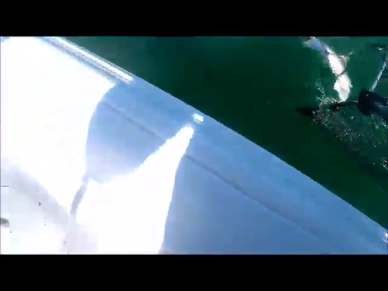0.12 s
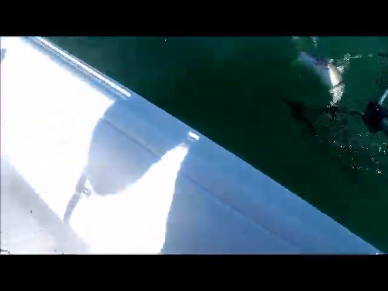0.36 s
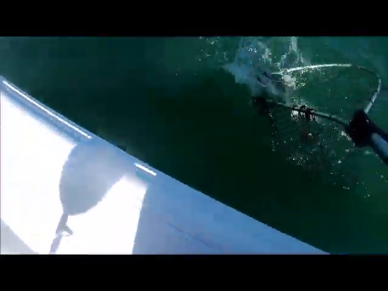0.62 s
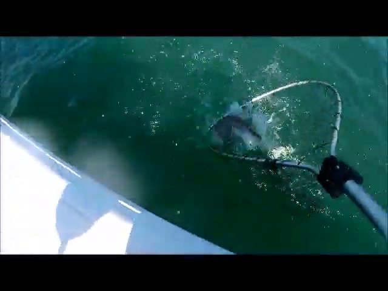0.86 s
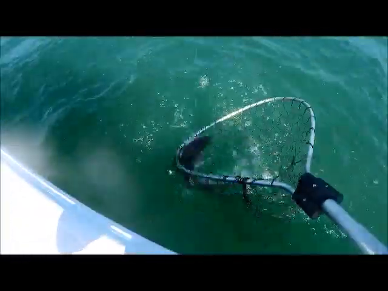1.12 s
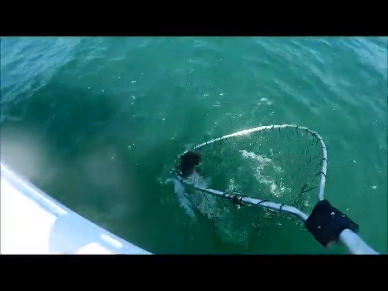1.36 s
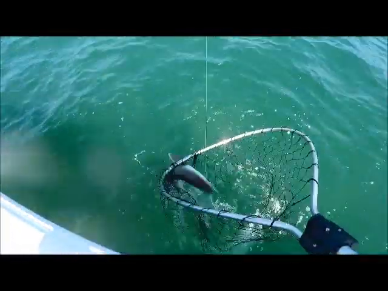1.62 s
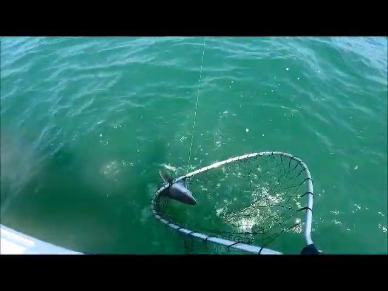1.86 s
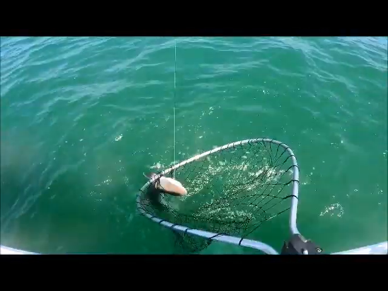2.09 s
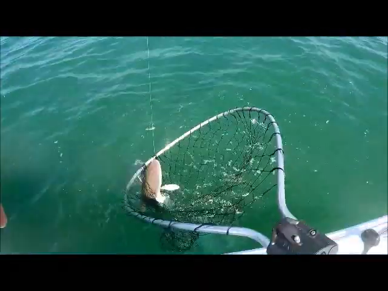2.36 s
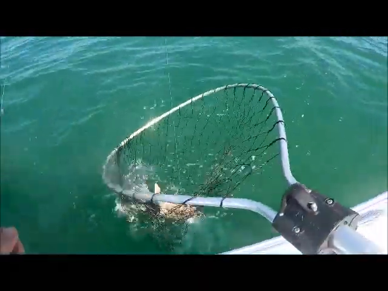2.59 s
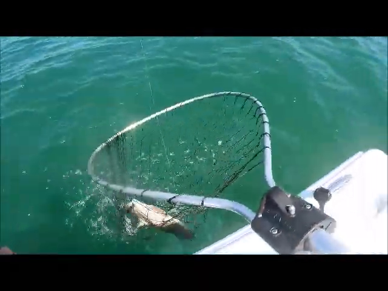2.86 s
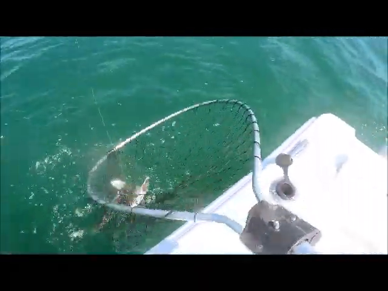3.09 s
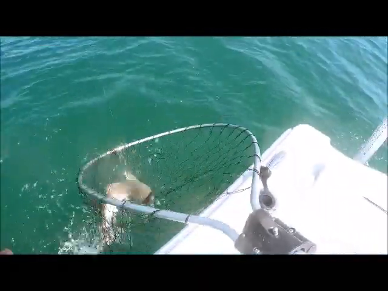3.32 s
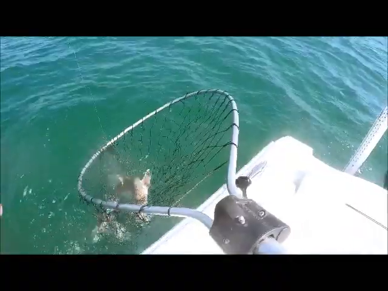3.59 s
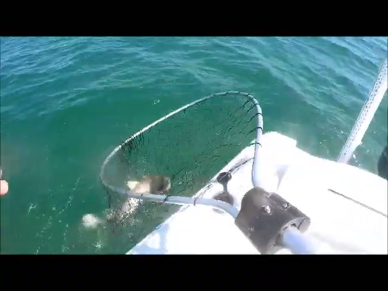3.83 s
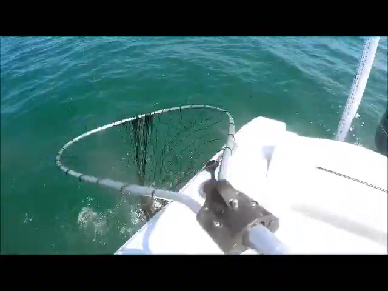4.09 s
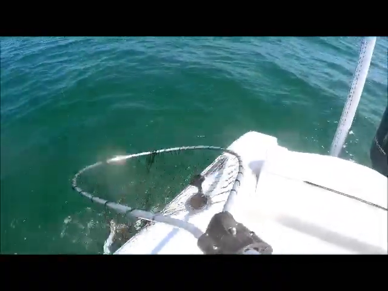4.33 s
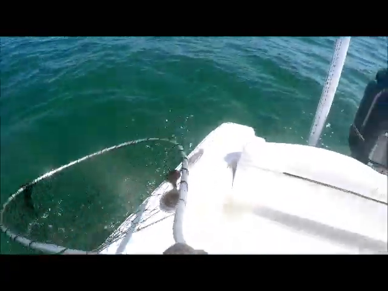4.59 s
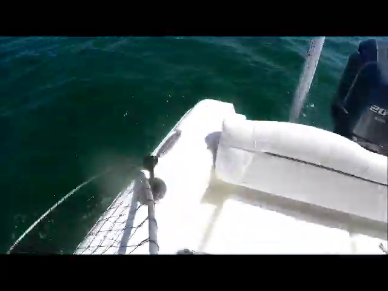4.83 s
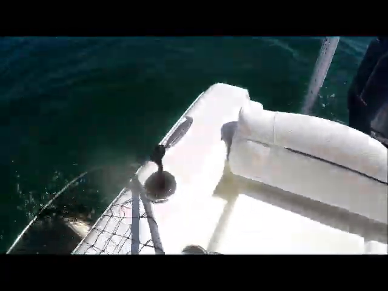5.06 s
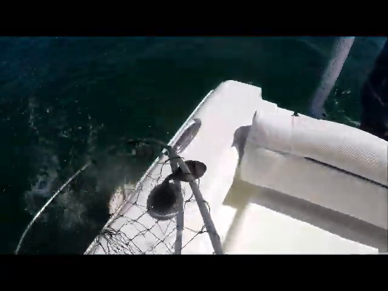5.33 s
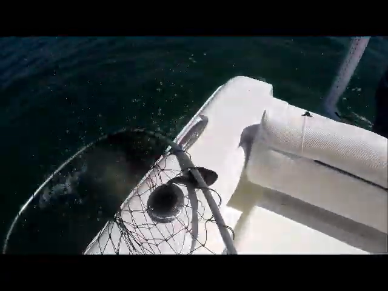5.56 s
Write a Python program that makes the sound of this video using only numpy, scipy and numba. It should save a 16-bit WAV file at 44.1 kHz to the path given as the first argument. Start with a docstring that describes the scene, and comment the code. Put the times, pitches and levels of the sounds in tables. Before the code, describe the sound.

Muffled watery slaps and bubbling churn under low wind rumble turn suddenly brighter, ending in sharp clattering knocks and hollow hull booms.

```python
"""Fish thrashing in a landing net

A fish thrashes in a net beside a boat, heard by a small camera in a plastic housing.
Damped gliding sines and noise bands make bubbles and spray; enveloped noise makes the slaps.
Late on the net frame knocks the hull: noise cracks, decaying modes and low booms. Housing
resonances colour water and knocks. Wind noise buffets the microphone over a faint low hum,
a whistle and patches of high hiss; the treble stays shut for the first three seconds."""
import sys
import numpy as np
from scipy import signal
from scipy.fft import rfft, irfft
from scipy.io import wavfile
from scipy.ndimage import uniform_filter1d
from numba import njit

SR = 44100
rng = np.random.default_rng(int(sys.argv[2]) if len(sys.argv) > 2 else 0)


def wav_out(sig):
    """Save sig, one row per channel (or a flat mono array), as 16-bit PCM at SR to the path in sys.argv[1]."""
    wavfile.write(sys.argv[1], SR, np.round(np.clip(np.atleast_2d(sig).T, -1, 1) * 32767).astype(np.int16))


def voltage_ratio(level):
    """Linear amplitude factor for a level in decibels (scalar or array-like)."""
    return 10 ** (np.asarray(level, float) / 20)


N = 250929
T = np.arange(N) / SR


def curve(table):
    """Linear interpolation: the columns after the time column, one value a sample."""
    s, *columns = np.transpose(table)
    return [np.interp(T, s, column) for column in columns]


def unit(x):
    """Power normalisation: scale to rms 1."""
    return x / np.sqrt(np.mean(x ** 2))


def noise(length=N):
    """White noise: equal power at all frequencies."""
    return rng.standard_normal(length)


def band(x, lo_hz, hi_hz, order=2):
    """Band limiting by a Butterworth band-pass."""
    edges_hz = [lo_hz, min(hi_hz, .45 * SR)]
    return signal.sosfilt(signal.butter(order, edges_hz, "band", fs=SR, output="sos"), x)


def walk(rate_hz):
    """Slow random modulation: levels held 1 / rate_hz seconds and smoothed twice, rms 1."""
    hold = int(SR / rate_hz)
    steps = np.repeat(noise(N // hold + 1), hold)
    return unit(uniform_filter1d(uniform_filter1d(steps, hold), hold)[:N])


def add(out, s, sound):
    """Superposition: mix a sound in at s seconds."""
    i = int(s * SR)
    out[i:i + len(sound)] += sound[:N - i]


def fade(t60_s, rise_s):
    """Exponential decay after a quick rise: time axis and envelope."""
    t = np.arange(int(t60_s * SR) + 64) / SR
    return t, (1 - np.exp(-t / rise_s)) * np.exp(-np.log(1000) * t / t60_s)


def swells(s, db, t60_s, rise_s):
    """Superposed envelopes: the gain of a string of quick rises and slower falls."""
    out = np.zeros(N)
    for start_s, level_db, fall_s in zip(s, db, t60_s):
        add(out, start_s, voltage_ratio(level_db) * fade(fall_s, rise_s)[1])
    return out


@njit
def ring(start, hz, cycles, size, glide, n):
    """Bubble resonance: damped sines glide up as they die, like bubbles rising to the surface."""
    out = np.zeros(n)
    for k in range(len(start)):
        length = int(5 * cycles[k] * SR / hz[k])
        # amplitude falls by a factor e every `cycles` periods of the starting pitch
        phase, decay = 0., hz[k] / (cycles[k] * SR)
        for i in range(min(length, n - start[k])):
            phase += 2 * np.pi * hz[k] * (1 + glide * i / length) / SR
            out[start[k] + i] += size[k] * np.exp(-i * decay) * np.sin(phase)
    return out


def grains(count, lo_hz, hi_hz, cycles, scatter_db, glide):
    """Random superposition: a shower of bubbles at random times, some louder than the rest."""
    when, pitch, loudness, damping = rng.random((count, 4)).T
    hz = lo_hz * (hi_hz / lo_hz) ** pitch
    size = voltage_ratio(-scatter_db * np.log(1 - .96 * loudness))
    start = (when * N).astype(np.int64)
    return unit(ring(start, hz, cycles * (.5 + damping), size, glide, N))


# How hard the fish churns the water, before ragged variation and the housing.
# Each row: time in seconds, bubble level in dB, fineness of the drops in dB.
CHURNING = [(0, -68.5, -13), (.32, -79, -22), (.35, -60.5, -19), (.44, -69.5, -8), (.48, -54, -23),
            (.69, -57, -14.5), (.9, -58.5, -6.5), (1.1, -57, -3), (1.16, -65, 4), (1.35, -59.5, -2),
            (1.52, -61.5, 9.5), (1.57, -64.5, -2), (1.94, -62.5, -4), (2.02, -68, -5), (2.3, -67, -20),
            (2.55, -64.5, -1), (3.05, -71.5, -8), (3.2, -65.5, -7), (3.3, -62, 3.5), (3.6, -64.5, 1.5),
            (3.82, -63.5, -7), (4.16, -65.5, 4.5), (4.41, -61, -1), (4.6, -67.5, -1.5), (4.84, -63.5, -0.5),
            (5.15, -65, 0), (5.4, -62.5, -3), (5.69, -53.5, -5.5)]
# Tail strokes that throw water, before ragged variation and the housing.
# Each row: start in seconds, bubble level in dB, fineness in dB, t60 in seconds.
TAIL_STROKES = [(.48, -55, 5, 0.19), (.578, -43, -13, 0.053), (.68, -63, 9, 0.35), (.96, -53, -15, 0.27),
                (1.065, -58, 9, 0.17), (1.355, -57.5, 15, 0.24), (1.448, -53, -25, 0.28),
                (1.513, -45.5, -1, 0.11), (2.323, -62, 19, 0.066), (2.395, -57, -3, 0.083),
                (2.772, -54.5, 0, 0.13), (3.1, -54, -15, 0.079), (3.452, -57.5, -6.5, 0.55),
                (3.55, -77, 24, 0.15), (3.835, -46, -12, 0.041), (3.904, -59.5, -8, 0.36),
                (4.166, -48.5, 1, 0.061), (4.555, -63, 6, 0.27), (4.774, -59.5, -1, .1),
                (4.9, -45, -28, 0.55), (5.03, -40.5, -25, 0.16), (5.18, -50.5, -19, 0.52),
                (5.25, -50.5, -19, 0.37)]


def water():
    """Bubble resonance and turbulence: bubbles, fizz and spray, each over a hiss of torn surface."""
    fizz_db, spray_db = -0.5, 4  # over the bubbles
    fizz_follows, spray_follows = 0.59, 0.49  # dB gained per dB of fineness
    stroke_rise_s = 0.0067
    sea_db = -69  # distant wash of small waves
    churn_db, fine_db = curve(CHURNING)
    s, stroke_db, stroke_fine_db, t60 = np.transpose(TAIL_STROKES)

    def gain(follows):
        """Gain of churning and tail strokes together, at a given share of the fineness."""
        strokes = swells(s, stroke_db + follows * stroke_fine_db, t60, stroke_rise_s)
        return voltage_ratio(churn_db + follows * fine_db) + strokes

    bubbles = grains(count=800, lo_hz=608.0, hi_hz=2815, cycles=5.8, scatter_db=3.5, glide=0.38)
    fizz = grains(count=1800, lo_hz=2200, hi_hz=5080, cycles=4.2, scatter_db=6.5, glide=0.16)
    spray = grains(count=7000, lo_hz=5350, hi_hz=11800, cycles=5.6, scatter_db=5.5, glide=0.075)
    bubble_hiss = unit(band(noise(), 400, 2050))
    fizz_hiss = unit(band(noise(), 2700, 4260))
    spray_hiss = unit(band(noise(), 5200, 11500))
    churn = gain(0) * (bubbles + voltage_ratio(-0.5) * bubble_hiss)
    churn += voltage_ratio(fizz_db) * gain(fizz_follows) * (fizz + voltage_ratio(-1) * fizz_hiss)
    churn += voltage_ratio(spray_db) * gain(spray_follows) * (spray + voltage_ratio(2.5) * spray_hiss)
    ragged_db = 1.2 * walk(70)
    sea = voltage_ratio(sea_db + 0.52 * walk(1.6)) * unit(band(noise(), 400, 10000, order=1))
    return voltage_ratio(ragged_db) * churn + sea


# Slaps and drops on the water, before the housing.
# Each row: start in seconds, spatter level in dB, starting cavity pitch in Hz,
# cavity level over the spatter in dB.
WATER_SLAPS = [(.338, -34, 1070, -5.5), (.367, -47, 3520, -4), (.381, -43.5, 2420, -3),
               (.418, -51, 1460, 8), (0.449, -55, 4400, 1), (.454, -45.5, 740, 5), (.473, -42, 1065, 11),
               (.528, -44, 950, 6), (.582, -38, 950, -6), (0.636, -36.5, 1510, -1), (.682, -33, 1050, -17),
               (.724, -40.5, 710, 12), (0.776, -52, 755, 22.5), (0.876, -42, 1090, -18),
               (.922, -45, 2750, 8), (.943, -52, 1010, -2), (.967, -35, 1050, -7), (1.003, -46, 1000, 12),
               (1.041, -55, 1010, 14), (1.073, -36, 926, 3.5), (1.128, -47, 1680, 10),
               (1.133, -51.5, 523, 13), (1.201, -52.5, 1550, 12), (1.231, -58, 1200, 14),
               (1.277, -43, 1010, -4), (1.362, -46, 4400, 12.5), (1.425, -41, 3820, 6.5),
               (1.453, -43, 1000, 6.5), (1.519, -35, 917, 3.5), (1.582, -53.5, 1380, 15),
               (1.648, -51, 2240, 3), (1.692, -39, 1100, -13), (1.724, -62, 1410, 20),
               (1.818, -52, 1050, 0), (1.861, -55, 4360, 10.5), (1.955, -57.5, 1080, 13.5),
               (2.304, -48.5, 1120, 2.5), (2.338, -55.5, 1070, 9), (2.395, -39.5, 1000, -12),
               (2.487, -38, 2390, -6), (2.767, -52, 3730, 9), (2.786, -50, 624, 12), (2.792, -42, 870, 0),
               (3.092, -51, 554, 4), (3.116, -59, 549, 13), (3.283, -44, 3880, 2), (3.308, -45, 1160, 2),
               (3.377, -38.5, 2280, -10), (3.555, -44, 2210, 5), (3.566, -51.5, 3160, 17),
               (3.607, -40.5, 980, -26), (3.751, -43, 3630, -6), (3.836, -55.5, 970, 14),
               (3.906, -42, 1040, -4), (4.07, -51.5, 930, 4), (4.176, -42, 1035, -2), (4.31, -40, 950, -11),
               (4.472, -52, 1130, 5), (4.519, -59, 1030, 10), (4.565, -60, 501, -8),
               (4.695, -40.5, 1080, -5.5)]


def slaps():
    """Cavity resonance: each short broad spatter excites a cavity that rings at a rising pitch."""
    out = np.zeros(N)
    for s, db, hz, cavity_db in WATER_SLAPS:
        t, env = fade(0.025, 0.0011)
        spatter = unit(band(noise(8192), 400, 9900, order=1))[:len(t)]
        cavity = np.sin(2 * np.pi * hz * t * (1 + 2.5 * t))
        add(out, s, voltage_ratio(db) * env * (spatter + voltage_ratio(cavity_db) * cavity))
    return out


# Knocks of the net frame, before the housing.
# Each row: start in seconds, crack level in dB, brightness over the crack in dB,
# crack pitch in Hz, t60 of the crack in seconds.
FRAME_KNOCKS = [(4.757, -51, 21.5, 3140, 0.037), (4.835, -59, 22, 4500, .02), (4.855, -45, 7, 3600, 0.052),
                (4.89, -17, 0.5, 3750, 0.054), (4.956, -27.5, -22, 3650, 0.035),
                (4.987, -52, 16, 4500, 0.017), (5.0, -37.5, 7, 3720, 0.015), (5.012, -16.5, 1, 2340, 0.059),
                (5.091, -47.5, -15, 2230, 0.059), (5.173, -39.5, -2, 2200, .13),
                (5.249, -57, 1, 3000, .077), (5.279, -45, -20, 2280, 0.049), (5.343, -46.5, 6, 2300, 0.11),
                (5.376, -42.5, 7.5, 2310, 0.031), (5.4415, -25.5, -2, 5050, 0.03),
                (5.473, -36, 3, 2050, 0.029), (5.514, -57, 11, 2200, .027), (5.5767, -12.5, 6, 4500, 0.009),
                (5.619, -44, 0, 2280, 0.014), (5.668, -43.5, 8, 3600, .059)]
# Modes of the net frame, before the random mix and the scaling of each blow.
# Each row: pitch in Hz, level relative to the crack in dB, nominal t60 in seconds.
FRAME_MODES = [(648, -4, 0.083), (1163, -17, 0.064), (1191, -4.5, 0.1), (1745, -17, 0.19), (2130, 0, 0.045),
               (2340, -5.5, 0.092), (2584, -6, 0.068), (3157, 0, 0.044), (3280, 9.5, 0.022),
               (3750, 5, 0.028)]


def crack(env, bright_db, hz, t60):
    """Impact noise: a pitched crack with a duller body and a treble that dies faster."""
    n = len(env)
    pitched = unit(band(noise(8192), 0.877 * hz, 1.103 * hz))[:n]
    # the shorter the contact, the more the crack's own pitch stands out
    mid = unit(band(noise(8192), 1360, 6900))[:n] + (.5 + .025 / t60) * pitched
    body_db = -5.5 - 3.5 * np.log2(hz / 2300)  # higher cracks have less body
    body = voltage_ratio(body_db) * unit(band(noise(8192), 464, 1490))[:n]
    bright = voltage_ratio(bright_db) * unit(band(noise(8192), 5400, 9100, order=1))[:n]
    return env * (mid + body + bright * env ** .5)


def knocks():
    """Modal excitation: a hard crack, a rattling tail, and frame modes in a new mix at every blow."""
    tail_db, tail_t60_s = -17.5, 0.061
    out = np.zeros(N)
    for s, db, bright_db, hz, t60 in FRAME_KNOCKS:
        env = fade(t60, 0.000093)[1]
        add(out, s, voltage_ratio(db) * crack(env, bright_db, hz, t60))
        # short contacts excite the modes less and for less time
        mode_gain = min(t60 / 0.046, 1)
        for mode_hz, mode_db, mode_t60 in FRAME_MODES:
            detune, share = noise(2)
            t, env = fade(mode_t60 * min(t60 / 0.07, 1.2), 0.0012)
            tone = np.sin(2 * np.pi * mode_hz * (1 + 0.013 * detune) * t)
            add(out, s, mode_gain * voltage_ratio(db + mode_db + 2.55 * share) * env * tone)
        t, env = fade(tail_t60_s, 0.0014)
        rattle = unit(band(noise(8192), 550, 3100))[:len(t)]
        # the shorter the contact, the freer the handle rings on
        handle = unit(band(noise(8192), 1970, 2140))[:len(t)] * (0.024 / t60) ** 1.43
        add(out, s, voltage_ratio(db + tail_db) * env * (rattle + handle))
    return out


# Booms of the hull.
# Each row: start in seconds, level in dB before the envelope, pitch in Hz, t60 in seconds.
HULL_BOOMS = [(0.124, -43.5, 406, 0.095), (0.482, -23, 172, 0.045), (0.609, -39.5, 214, 0.097),
              (0.726, -33.5, 259, 0.094), (1.044, -30.5, 304, 0.032), (1.128, -38, 253, 0.054),
              (1.516, -18.5, 270, 0.026), (2.404, -38.5, 177.6, 0.2), (2.515, -30, 199, 0.14),
              (2.557, -33.5, 205.5, 0.12), (3.09, -38, 164, 0.055), (3.85, -38.5, 318, 0.077),
              (3.987, -33.5, 272, 0.057), (4.307, -22.5, 148, 0.097), (4.698, -37.5, 230, 0.088),
              (4.86, -24, 224, 0.045), (4.894, -26, 251, 0.14), (5.029, -15.5, 238, 0.07),
              (5.113, -30, 213, 0.092), (5.183, -27, 175, 0.028), (5.283, -37, 215, 0.17),
              (5.358, -31.5, 236, 0.11), (5.449, -23, 226, 0.093), (5.578, -15.5, 328, 0.022)]


def thumps():
    """Damped oscillation: the hull booms briefly when water or the frame hits it."""
    out = np.zeros(N)
    for s, db, hz, t60 in HULL_BOOMS:
        t, env = fade(t60, 0.003)
        add(out, s, voltage_ratio(db) * env * np.sin(2 * np.pi * hz * t))
    return out


# Wind strength at the microphone port, before random variation.
# Each row: time in seconds, rumble level in dB.
WIND_STRENGTH = [(0, -37), (.1, -43), (.33, -50), (.46, -35), (.62, -44.5), (.97, -40), (1.05, -45.5),
                 (1.38, -41), (1.8, -41.5), (1.87, -37.5), (2.1, -43), (2.25, -38), (2.8, -34),
                 (3.05, -39.5), (3.1, -31), (3.77, -34.5), (4.14, -31.5), (4.28, -44.5), (4.33, -14),
                 (4.4, -29.5), (4.86, -30.5), (5.07, -37), (5.18, -28), (5.3, -36.5), (5.69, -34.5)]
# Puffs that raise the flutter, before random variation.
# Each row: start in seconds, level in dB, t60 in seconds.
WIND_PUFFS = [(0.431, -35.5, 0.84), (.6, -46, 0.56), (.72, -37, 0.14), (1.5, -40, 0.27),
              (1.78, -46.5, 0.51), (2.06, -45.5, 0.64), (2.32, -41, 0.81), (2.5, -33, 0.28),
              (2.7, -40, 0.42), (2.88, -49, 0.36), (3.28, -50.5, 1), (3.92, -37, 0.45), (4.15, -37, 0.17),
              (4.3, -39, 0.46), (4.72, -47, 0.34), (4.89, -24.5, 0.37), (5.01, -38, 0.88),
              (5.15, -53, 0.57), (5.43, -41, 0.34), (5.56, -39.5, 0.26)]
# Single heavy buffets.
# Each row: start in seconds, level in dB before the envelope, pitch in Hz, t60 in seconds.
WIND_BUFFETS = [(0.599, -25.5, 35, 0.22), (0.731, -32, 40, 0.085), (1.86, -28, 36.2, 0.2),
                (2.07, -29, 35, 0.077), (2.29, -28, 33, 0.12), (2.511, -26, 32.4, .15),
                (3.149, -19.5, 26.1, .22), (3.738, -20, 29.8, 0.51), (3.858, -18.5, 32.4, 0.38),
                (4.31, -12.5, 48, 0.25), (4.909, -8, 71, 0.075), (4.93, -7, 35.4, 0.12),
                (5.118, -20, 32.6, .13)]


def wind():
    """Turbulence over the port: slow rumble, faster flutter that comes in puffs, single buffets."""
    flutter_db, flutter_follows = -51.5, 0.084  # level in a -39.5 dB wind; dB gained per dB of wind
    wind_db = curve(WIND_STRENGTH)[0]
    rumble = unit(band(noise(), 23.1, 48.2)) * voltage_ratio(2.6 * walk(9))
    flutter = unit(band(band(noise(), 55, 134.5, order=1), 35, 337))
    flutter = flutter * voltage_ratio(2.5 * walk(25))
    flutter_gain = voltage_ratio(flutter_db + flutter_follows * (wind_db + 39.5))
    flutter_gain = flutter_gain + swells(*np.transpose(WIND_PUFFS), rise_s=.02)
    out = voltage_ratio(wind_db) * rumble + flutter_gain * flutter
    for s, db, hz, t60 in WIND_BUFFETS:
        t, env = fade(t60, 0.0023)
        add(out, s, voltage_ratio(db) * env * np.sin(2 * np.pi * hz * t))
    return out


# Swells of the high hiss, before random variation.
# Each row: start in seconds, level in dB, t60 in seconds.
HISS_SWELLS = [(3.19, -61, 0.57), (4.079, -59, 0.42), (4.15, -64, 0.2), (4.24, -75, 0.36), (4.36, -74, 1.5),
               (4.75, -68, .1), (4.92, -79, 0.53), (5.2, -71, .8), (5.55, -53, 0.3)]


def sizzle():
    """Amplitude-modulated band noise: a narrow high hiss that swells in patches."""
    gain = voltage_ratio(-85.5) + swells(*np.transpose(HISS_SWELLS), rise_s=.02)
    return gain * voltage_ratio(1.5 * walk(20)) * unit(band(noise(), 10570, 11270, order=3))


# Fading of the low hum, before random variation.
# Each row: time in seconds, level in dB.
HUM_LEVEL = [(0, -52), (2.2, -52.5), (3.0, -90), (5.69, -94)]


def hum():
    """Pure tones with random modulation: a wavering low hum that fades, and a thin steady whistle."""
    hum_hz = 149 + 1.544 * walk(2.0)
    low = voltage_ratio(curve(HUM_LEVEL)[0] + walk(9.7)) * np.sin(2 * np.pi * np.cumsum(hum_hz) / SR)
    whistle = voltage_ratio(-78 + 1.5 * walk(5.6)) * np.sin(2 * np.pi * 8630 * T)
    return low + whistle


# Resonances of the plastic housing, before overall normalisation.
# Each row: centre in Hz, width between the -6 dB points in Hz, level in dB.
SHELL_RESONANCES = [(1010, 218, -2.5), (1580, 160, -10.5), (2280, 215, -6.5), (3140, 140, -9),
                    (3673, 275, -9), (4400, 260, -7)]
# What passes the housing wall between its resonances, before overall normalisation.
# Each row: frequency in Hz, level in dB.
WALL_TRANSMISSION = [(150, -8), (400, -5), (650, -18.5), (1300, -10.5), (1900, -11.5), (2700, -13),
                     (4700, -12), (5200, -20), (7000, -22), (9000, -25), (10200, -30.5), (11000, -22),
                     (15000, -20)]


def housing(x):
    """Minimum-phase filtering: the shell rings and passes a dull share; white noise keeps its rms."""
    wall_hz, wall_db = np.transpose(WALL_TRANSMISSION)
    f = np.arange(2049) * SR / 4096
    power = voltage_ratio(np.interp(np.log(f + 1), np.log(wall_hz), wall_db)) ** 2
    for centre_hz, width_hz, db in SHELL_RESONANCES:
        power = power + voltage_ratio(db) ** 2 / (1 + (2 * (f - centre_hz) / width_hz) ** 2) ** 2
    # folding the cepstrum makes the response causal
    cepstrum = irfft(np.log(power) / 2)
    cepstrum[1:2048] *= 2
    cepstrum[2049:] = 0
    taps = irfft(np.exp(rfft(cepstrum)))
    return signal.fftconvolve(x, taps / np.sqrt(np.sum(taps ** 2)))[:N]


def scene():
    """Superposition: water and knocks pass the housing; the other layers bypass it."""
    airborne = housing(water() + slaps() + knocks())
    return (airborne + thumps() + wind() + sizzle() + hum())[None]


def low_pass(x):
    """Removes everything above the highest recorded frequency."""
    return signal.sosfilt(signal.butter(12, 16540, fs=SR, output="sos"), x)


def record(dry):
    """Low-pass filtering: dull over faint electronic hiss, then open at once to a steep top edge."""
    shut_hz, top_hz, treble_opens_s = 6015, 15250, 3.093
    shelf_hz, shelf_db = 4700, -10.5  # the top of what still passes is turned down
    dull = signal.sosfiltfilt(signal.ellip(5, .3, 50, shut_hz, fs=SR, output="sos"), dry)
    low = signal.sosfiltfilt(signal.butter(6, shelf_hz, fs=SR, output="sos"), dull)
    hiss = voltage_ratio(-84) * unit(band(noise(), 2000, shut_hz, order=4))
    dull = low + voltage_ratio(shelf_db) * (dull - low) + hiss
    full = signal.sosfiltfilt(signal.ellip(6, .3, 45, top_hz, fs=SR, output="sos"), dry)
    return low_pass(np.where(T < treble_opens_s, dull, full))


dry = scene()
out = record(dry)
wav_out(out)
```